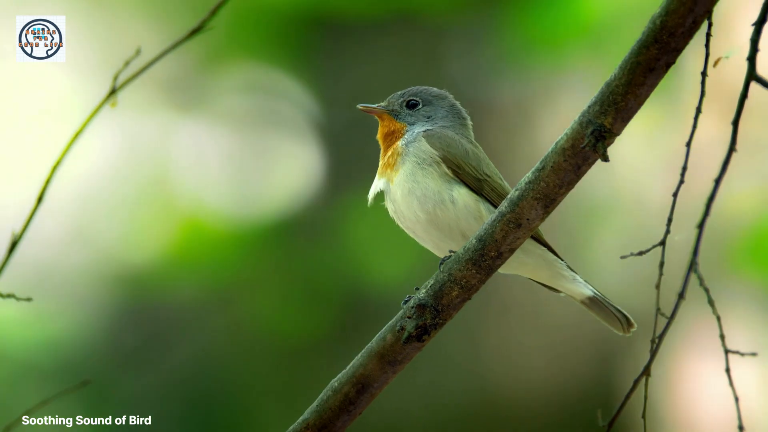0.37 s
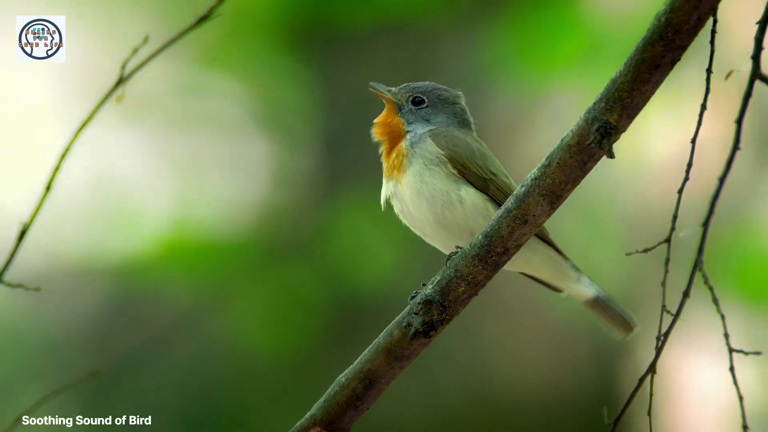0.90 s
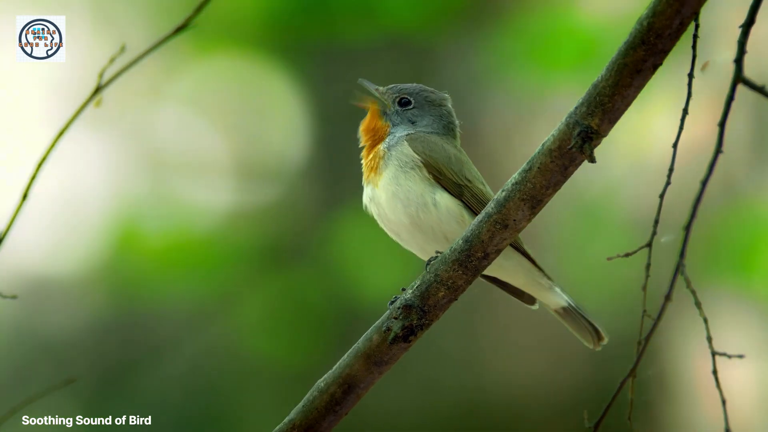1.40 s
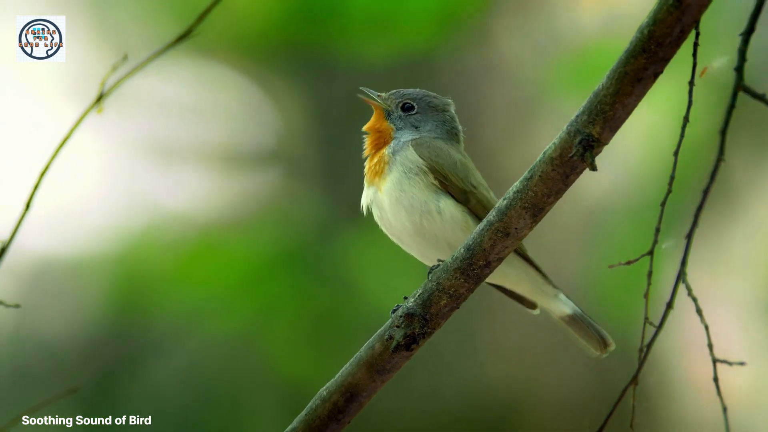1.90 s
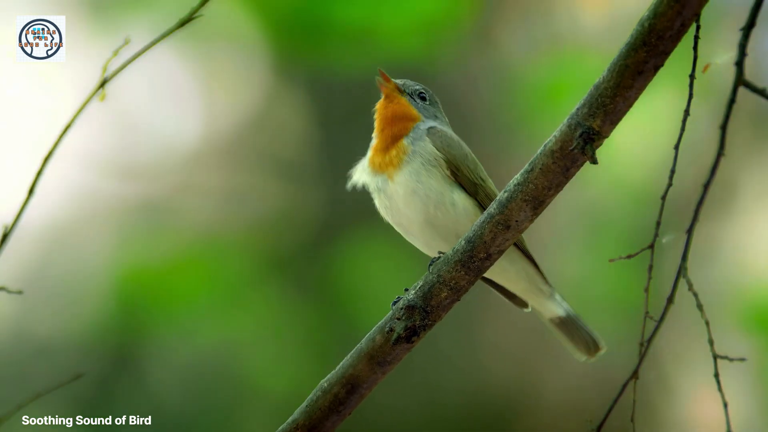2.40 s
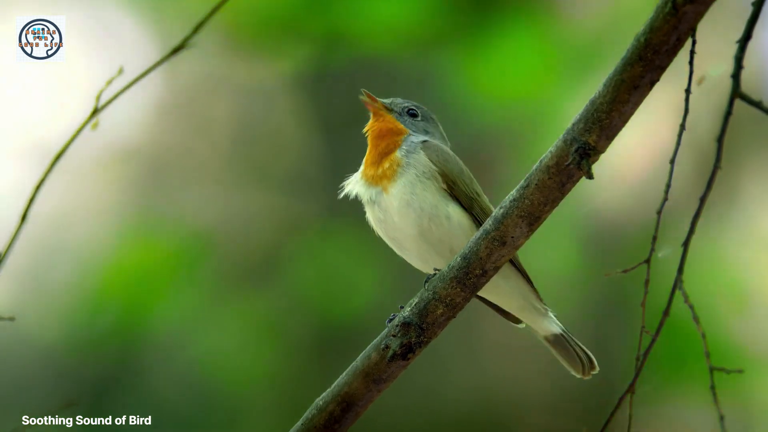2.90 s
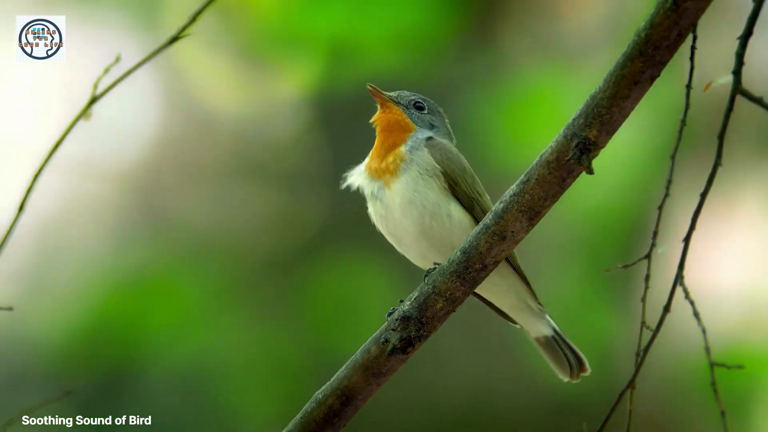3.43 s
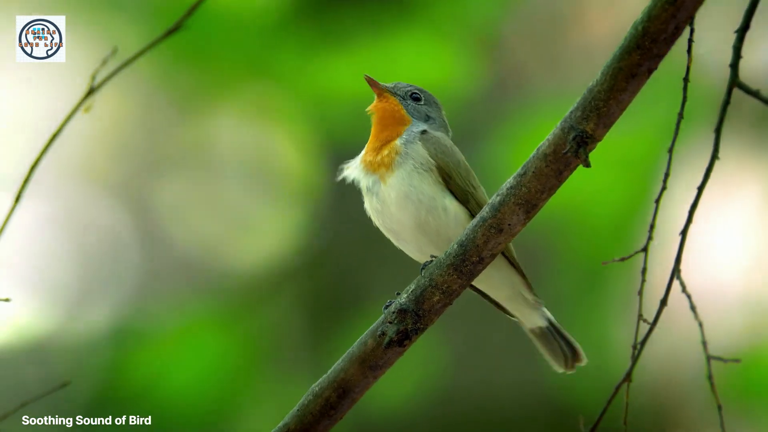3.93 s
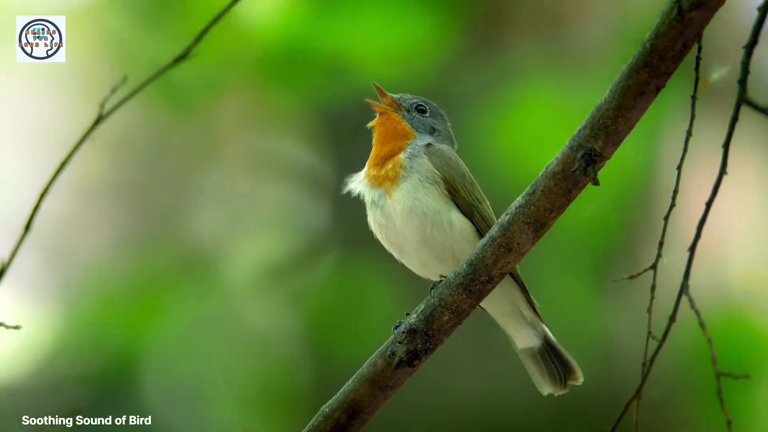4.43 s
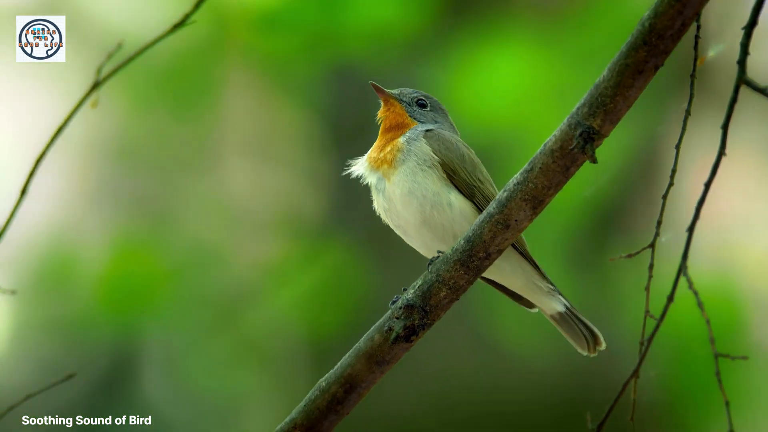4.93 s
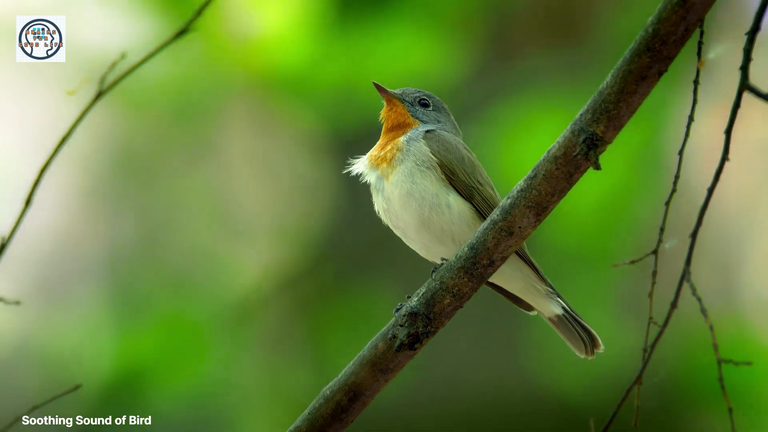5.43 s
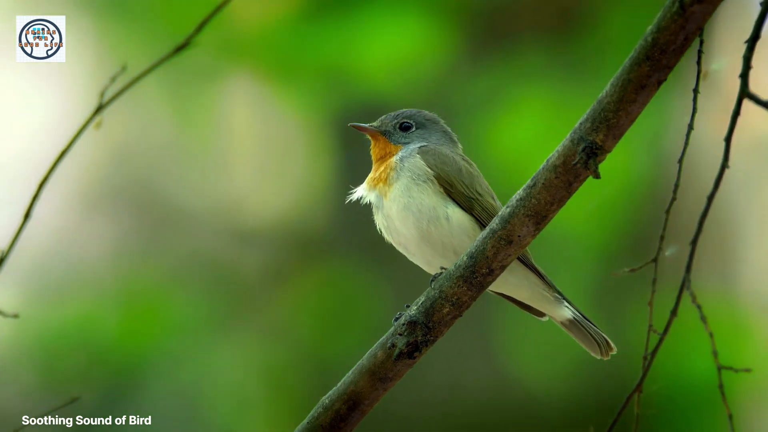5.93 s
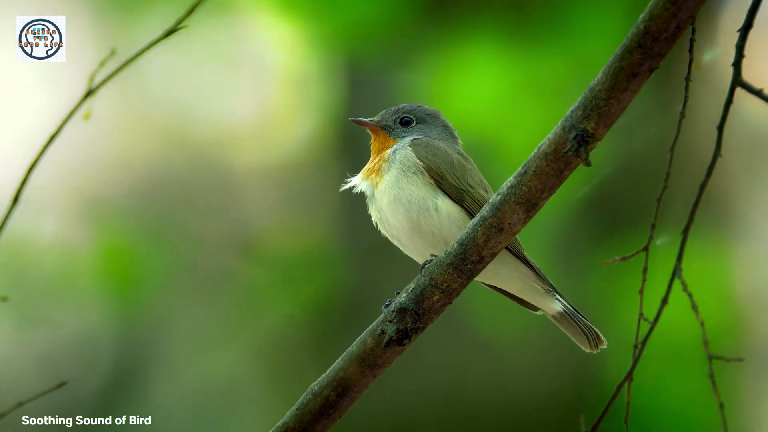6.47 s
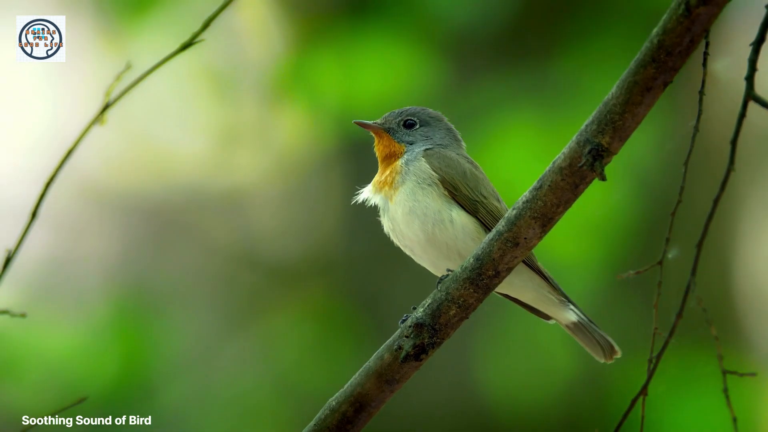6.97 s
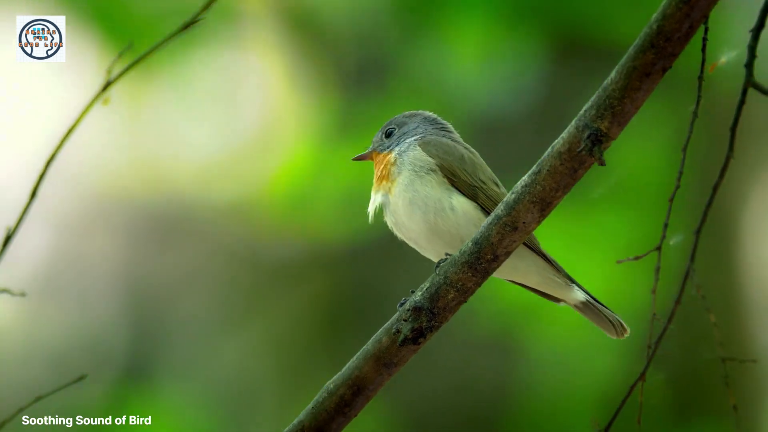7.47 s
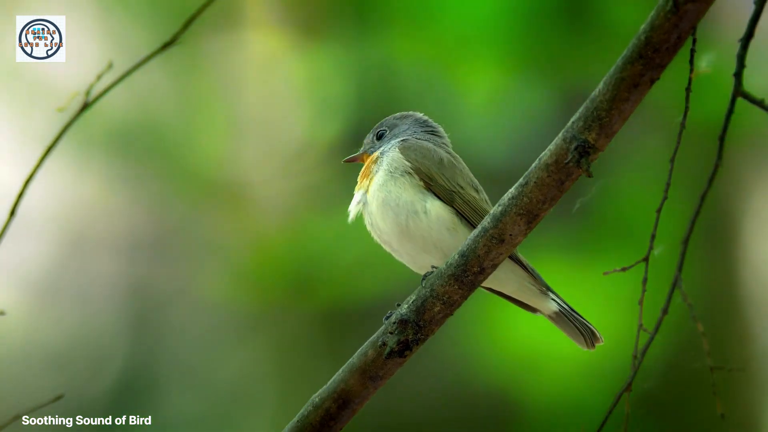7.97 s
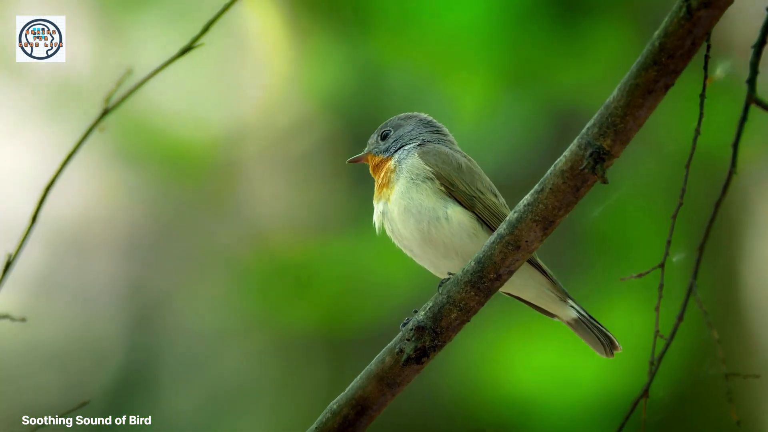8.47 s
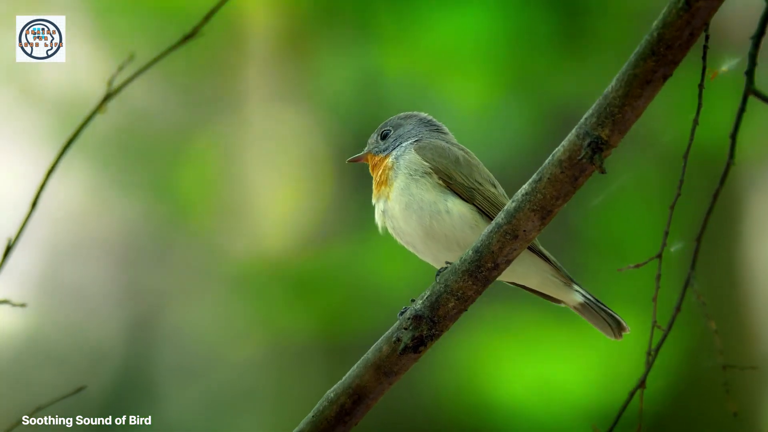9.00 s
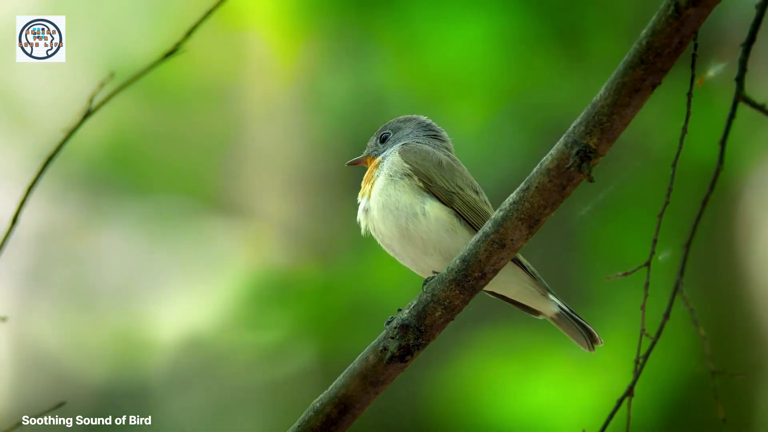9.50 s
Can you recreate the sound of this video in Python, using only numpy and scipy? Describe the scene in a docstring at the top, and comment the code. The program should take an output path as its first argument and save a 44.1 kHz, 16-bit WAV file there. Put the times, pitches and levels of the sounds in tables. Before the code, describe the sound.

A nearby songbird whistles a quickening, gradually lowering phrase, other birds calling around it, over a steady rushing stream with bubbles and droplet ticks.

```python
"""A songbird close by whistles a falling phrase; other birds call left, right and far off over a rushing stream.
Birds: gliding sine tones with level contours; a distant trill is a run of down-slurs.
Wood: discrete echoes of the near bird and decaying stereo noise tails on all birds.
Stream: banded noise rush, damped-sine bubbles and droplet ticks, and a hollow drone of resonant noise.
The middle of the rush's top treble drops out and returns."""
import sys
import numpy as np
from scipy import signal
from scipy.io import wavfile
from scipy.ndimage import uniform_filter1d

SR = 44100
rng = np.random.default_rng(int(sys.argv[2]) if len(sys.argv) > 2 else 0)


def master_out(mix):
    """Clip the mix to full scale and print it as 16-bit PCM to the path in sys.argv[1]."""
    frames = np.transpose(np.atleast_2d(mix))
    ceiling = np.clip(frames, -1, 1)
    pcm = np.round(ceiling * 32767).astype(np.int16)
    wavfile.write(sys.argv[1], SR, pcm)


def undo_db(level):
    """Turn decibels back into plain size, where 20 dB means ten times bigger."""
    steps = np.asarray(level, float) / 20
    return 10 ** steps


N = 424241

# Note shapes: (time [share of length], glide [share from first to last pitch], level offset [dB])
LEVELLING_RISE_SHAPE = [(0, 0, -13.5), (0.139, 0.412, -1.5), (.34, .78, 0.5), (.66, 1.1, 0), (1, 0.98, -16)]
DROP_SHAPE = [(0, 0, -6), (0.18, 0.7, 4), (.5, .83, 4), (1, 0.97, 0.1)]
HELD_SHAPE = [(0, 0.032, 0.5), (0.399, 0.33, 0.73), (1, 1, -1.1)]
SWEEP_SHAPE = [(0, 0.12, -2.5), (.3, 0.43, -0.5), (.7, .8, -2), (1, 0.94, -3.5)]
AHEAD = (0.7, 0.05)   # direction: (left over right [dB], phase lead of left [rad])


def unit_rms(x):
    """Scale to unit rms."""
    return x / np.sqrt(np.mean(x ** 2) + 1e-20)


def at_hz(points, hz):
    """Read a spectrum on a log-frequency axis."""
    table_hz, value = np.transpose(points)
    return np.interp(np.log(hz), np.log(table_hz), value)


def drift(corner_hz):
    """Slow random signal of about unit spread: noise through two one-pole lowpasses."""
    step = 40   # samples per control point
    warmup = 2000
    pole = np.exp(-2 * np.pi * corner_hz * step / SR)
    noise = rng.standard_normal(N // step + 2 + warmup)
    slow = signal.lfilter([1], [1, -2 * pole, pole ** 2], noise)[warmup:]
    return np.interp(np.arange(N) / step, np.arange(len(slow)), unit_rms(slow - slow.mean()))


def panned(x, pan_db):
    """Split into two channels, left pan_db above right."""
    return x * undo_db(np.array([[0.5], [-0.5]]) * pan_db)


def add(out, sound, start_s):
    """Mix a short sound in at start_s."""
    i = max(round(start_s * SR), 0)
    out[..., i:i + sound.shape[-1]] += sound[..., :N - i]


def notes(events, shape):
    """Lay one shape over each event: rows of (time [s], pitch [Hz], level [dB])."""
    at, share, offset_db = np.transpose(shape)
    out = []
    for start_s, length_s, first_hz, last_hz, db, *change_db in events:
        hz = first_hz + share * (last_hz - first_hz)
        level_db = db + offset_db + sum(change_db) * (at - 0.5)
        out.append(np.transpose([start_s + at * length_s, hz, level_db]))
    return out


def whistle(rows, edge_s, flutter_db, wobble, flutter_per_s):
    """One note: a rotating complex tone on a rounded glide, soft edges, unsteady pitch and level."""
    s, hz, db = np.transpose(rows)
    t = np.arange(s[0] - edge_s, s[-1] + edge_s, 1 / SR)
    since_start = t - t[0]
    rounding = max(int(np.diff(s).min() * SR * 0.44), 1)   # samples
    glide_hz = uniform_filter1d(np.interp(t, s, hz), size=rounding, mode="nearest")
    edges = np.clip(np.minimum(since_start, t[-1] - t) / edge_s, 0, 1) ** 2
    knots, bends = rng.standard_normal((2, 64))
    glide_hz = glide_hz * (1 + wobble * np.interp(since_start * 120, np.arange(64), bends))
    flutter = flutter_db * np.interp(since_start * flutter_per_s, np.arange(64), knots)
    level = undo_db(np.interp(t, s, db) + flutter) * edges
    return level * np.exp(2j * np.pi * np.cumsum(glide_hz) / SR), t[0]


def woods(x, t60_s, alike, onset_s):
    """Scattering off many trunks: convolution with a noise tail that swells, then dies away."""
    t = np.arange(SR) / SR
    mid, side = rng.standard_normal((2, SR))
    alike = np.clip(alike, 0, 1)
    tail = np.sqrt(alike) * mid + np.sqrt(1 - alike) * side * [[1], [-1]]
    tail = tail * undo_db(-60 * t / t60_s) * (1 - np.exp(-t / onset_s))
    tail = tail / np.sqrt(np.sum(tail ** 2) / 2)
    return signal.fftconvolve(np.broadcast_to(x, (2, N)), tail, axes=1)[:, :N]


def slurs():
    """The singer's hooked drops, loudest as they cross the throat's resonance."""
    throat_hz, throat_db_per_octave = 3700, 10.5
    # Slur shape: (time [s], last row ignored: end of note; glide [share from top to last pitch], offset [dB])
    slur_shape = [(0, 0.2746, -20), (0.012, 0.025, 8.5), (.021, 0.129, 8.5), (0.032, 0.425, 10),
                  (.045, .68, 9.5), (.058, .85, 7.5), (1, 0.98, -5)]
    # (time [s], length [s], top [Hz], last [Hz], level [dB], extra time leaving the top [s])
    slur_events = [(0.988, 0.056, 4890, 3340, -31.5, 0.011), (2.036, 0.076, 4925, 3270, -28, 0.0089),
                   (2.53, 0.087, 4960, 3250, -24.5, .003), (3.034, 0.09, 4845, 3244, -25, 0.0021),
                   (3.296, 0.091, 4795, 3237, -25, .003), (3.555, 0.12, 4547, 3137, -26.5, 0.0046),
                   (3.825, 0.099, 4406, 3132, -27.5, 0.0024), (4.109, 0.11, 4580, 2990, -27, 0.0023),
                   (4.418, 0.11, 4220, 2910, -27, 0.00091)]
    at_s, share, offset_db = np.transpose(slur_shape)
    late = np.arange(len(at_s) - 1) >= 2   # points after the top
    out = []
    for start_s, length_s, top_hz, last_hz, db, linger_s in slur_events:
        t = np.append(at_s[:-1] + linger_s * late, length_s)
        hz = top_hz + share * (last_hz - top_hz)
        off_resonance_db = throat_db_per_octave * np.abs(np.log2(hz / throat_hz))
        level_db = db + offset_db - off_resonance_db
        out.append(np.transpose([start_s + np.maximum.accumulate(t), hz, level_db]))
    return out


def singer():
    """The near bird's gliding tones, dulled echoes off ground and trunks, and a diffuse tail."""
    # Note shapes: (time [share of length], glide [share from first to last pitch], level offset [dB])
    thin_fall_shape = [(0, 0.044, -24), (0.278, 0.58, -8.5), (.55, .9, -9.5), (1, 0.99, -11)]
    mid_rise_shape = [(0, 0.031, -15.5), (.4, 0.4, -4.5), (0.749, .88, -6), (1, 0.91, -11.5)]
    chip_shape = [(0, 0.034, -1.5), (1, 1, 9)]
    # Notes: (time [s], length [s], first [Hz], last [Hz], level [dB])
    thin_falls = [(.015, 0.042, 7550, 6400, -33), (.255, 0.054, 8000, 6340, -30.5),
                  (.49, 0.05, 8100, 6320, -28), (.705, 0.065, 8540, 6300, -26),
                  (1.275, 0.061, 8440, 6300, -26.5), (1.54, 0.045, 7500, 6380, -22),
                  (1.77, 0.062, 8300, 6350, -21.5), (2.252, 0.058, 8390, 6380, -18),
                  (2.745, 0.062, 8280, 6230, -18)]
    chips = [(1.25, 0.013, 5870, 5940, -47.5), (2.228, 0.015, 5670, 6100, -42),
             (2.722, 0.011, 5600, 5970, -36.5)]
    # Notes: (time [s], length [s], first [Hz], last [Hz], level [dB],
    #         level change from start to end of the note, partly from overlapping echoes [dB])
    mid_rises = [(.062, 0.044, 5370, 5900, -31, -12), (.315, 0.043, 5430, 5880, -29, -18),
                 (.53, 0.069, 5000, 5460, -27.5, -10), (.76, 0.064, 5290, 5590, -25.5, 3),
                 (1.33, 0.054, 5210, 5660, -23.5, 13), (1.57, 0.073, 4970, 5870, -19.5, -3),
                 (1.812, 0.068, 4990, 5650, -20, -1), (2.297, 0.064, 5100, 5770, -17, 7),
                 (3.272, 0.032, 5370, 5435, -25, -2)]
    levelling_rises = [(.908, 0.059, 3920, 4220, -23, 11), (1.957, 0.066, 3870, 4230, -21, 4),
                       (2.447, 0.088, 3970, 4253, -18, 2), (2.8, 0.075, 4740, 5600, -21, 1),
                       (2.946, 0.097, 3827, 4210, -16.5, 4), (3.21, 0.079, 3615, 4090, -14, 6),
                       (3.475, 0.085, 3620, 4000, -15.5, -1), (3.75, 0.086, 3600, 3930, -16, -6),
                       (4.027, 0.082, 3520, 3892, -15.5, -0.5), (4.337, 0.087, 3490, 3850, -17.5, -2)]
    # Echoes: (delay [s], level [dB])
    echoes = [(.0073, -9), (.017, -6), (.03, -27)]
    song = notes(thin_falls, thin_fall_shape) + notes(mid_rises, mid_rise_shape)
    song += notes(chips, chip_shape) + notes(levelling_rises, LEVELLING_RISE_SHAPE) + slurs()
    voice = np.zeros(N)
    for note in song:
        tone, start_s = whistle(note, edge_s=0.0066, flutter_db=1.0, wobble=0.003, flutter_per_s=110.0)
        add(voice, tone.imag, start_s)
    heard = voice.copy()
    echo_cut_hz = 7500   # leaves soak up the highs
    dulled = signal.sosfilt(signal.butter(2, echo_cut_hz, fs=SR, output="sos"), voice)
    for delay_s, db in echoes:
        add(heard, undo_db(db) * dulled, delay_s)
    return heard + undo_db(-6.5) * woods(voice, t60_s=0.94, alike=1.0, onset_s=0.0036)


def others(calls, wet_db, flutter_db, wobble, t60_s, flutter_per_s):
    """Whistled calls, each direction with its own level and phase between channels, plus a tail."""
    voices = np.zeros((2, N))
    for (pan_db, lead_rad), events, shape in calls:
        for note in notes(events, shape):
            tone, start_s = whistle(note, edge_s=0.0066, flutter_db=flutter_db, wobble=wobble,
                                    flutter_per_s=flutter_per_s)
            stereo = tone * np.exp([[0], [-1j * lead_rad]])
            add(voices, panned(stereo, pan_db).imag, start_s)
    return voices + undo_db(wet_db) * woods(voices, t60_s=t60_s, alike=0.67, onset_s=0.004)


def neighbours():
    """Lower-voiced birds nearby: whistled notes from the right, left and ahead."""
    # Directions: (left over right [dB], phase lead of left [rad])
    left, right = (2.6, -2.24), (-4.5, 0.34)
    # Note shapes: (time [share of length], glide [share from first to last pitch], level offset [dB])
    arch_shape = [(0, 0.41, -5.5), (.55, 0.86, -2), (1, 0.066, -1)]
    peak_shape = [(0, 0.039, -8), (.3, 0.6, -1.5), (.6, 1, -3), (1, 0.05, 1.5)]
    # Calls by direction and shape: (time [s], length [s], first [Hz], last [Hz], level [dB])
    right_drops = [(.376, 0.0392, 3250, 2340, -29), (.487, 0.045, 3690, 2094, -31),
                   (.613, 0.044, 3105, 2217, -30.5), (.955, 0.035, 2850, 2000, -32),
                   (1.083, 0.0263, 3096, 2040, -31.5), (1.203, 0.032, 2810, 2036, -34.5)]
    right_sweeps = [(1.685, 0.021, 2570, 2270, -34), (1.706, 0.013, 2205, 2020, -36),
                    (1.808, 0.039, 3050, 2177, -30.5), (1.933, 0.041, 2900, 2075, -32.5)]
    right_peaks = [(3.107, 0.056, 2493, 3580, -33)]
    right_arches = [(2.851, 0.024, 2560, 2870, -35)]
    left_arches = [(.492, 0.0544, 3790, 3954, -24), (.758, 0.0514, 4208, 4440, -27.5),
                   (2.2, 0.015, 2965, 3000, -27), (2.36, 0.031, 2700, 2870, -32),
                   (2.39, 0.02, 3540, 3750, -37.5), (2.475, 0.022, 2970, 3070, -39.5)]
    left_held = [(.54, 0.079, 3783, 3630, -30), (2.135, 0.045, 3700, 3700, -44),
                 (2.296, 0.028, 3030, 3100, -39), (2.566, 0.034, 2630, 2410, -39),
                 (2.8, 0.027, 2638, 2533, -42)]
    ahead_held = [(.001, 0.044, 2496, 2146, -37.5), (.001, 0.17, 3734, 3800, -45),
                  (.001, 0.12, 4330, 4280, -50), (.265, 0.0715, 3740, 3660, -35),
                  (.41, 0.056, 3626, 3615, -34), (1.74, 0.029, 2770, 3403, -38),
                  (2.7, 0.02, 3500, 3510, -38)]
    right_calls = [(right, right_drops, DROP_SHAPE), (right, right_sweeps, SWEEP_SHAPE),
                   (right, right_peaks, peak_shape), (right, right_arches, arch_shape)]
    other_calls = [(left, left_arches, arch_shape), (left, left_held, HELD_SHAPE),
                   (AHEAD, ahead_held, HELD_SHAPE)]
    return (others(right_calls, wet_db=-1.8, flutter_db=1.8, wobble=0.005, t60_s=0.9, flutter_per_s=140.0)
            + others(other_calls, wet_db=-0.5, flutter_db=3.0, wobble=0.006, t60_s=1.0, flutter_per_s=140.0))


def far_birds():
    """Thin whistled calls from deeper in the wood, to the sides and ahead."""
    # Directions: (left over right [dB], phase lead of left [rad])
    far_left, far_right = (2.5, -2.13), (-4.5, 1.2)
    # Note shapes: (time [share of length], glide [share from first to last pitch], level offset [dB])
    droop_shape = [(0, 0.14, -4), (.4, 0.16, -2), (.78, .5, 7), (1, 0.89, 3)]
    hook_shape = [(0, -0.039, -1), (.25, 0.917, -2.5), (.82, 1, 0.5), (1, -1.2, -1)]
    churr_shape = [(0, .55, -6), (.21, 0, -6), (.35, .3, -2), (.48, 0, -5.5), (.63, .33, -4),
                   (.78, .05, -1), (1, 0.96, -6)]
    short_churr_shape = [(0, .4, -5), (.45, 0.044, -2), (.72, .06, 0), (1, 1, -2)]
    fading_shape = [(0, 0.14, 3.5), (1, 1, -9.5)]
    # Calls: (time [s], length [s], first [Hz], last [Hz], level [dB]);
    # some left_held add (level change from start to end of the note [dB])
    left_droops = [(1.56, 0.062, 8150, 6900, -48), (1.69, 0.067, 8200, 6900, -48),
                   (1.83, .08, 8250, 6900, -47), (1.99, 0.086, 8100, 7500, -49)]
    left_held = [(0.039, 0.083, 7570, 7170, -40), (.07, 0.079, 7950, 8000, -51),
                 (.22, 0.18, 7580, 7410, -49.5), (.26, 0.1, 3780, 3350, -40), (0.319, .06, 3950, 4050, -43),
                 (6.505, 0.057, 7570, 8020, -48.5), (6.575, 0.058, 6960, 5140, -48),
                 (6.695, .072, 3870, 2900, -35.5, 2.5), (6.79, .05, 3800, 3880, -46),
                 (1.41, .075, 8020, 7500, -41, 4), (6.775, 0.055, 3150, 3450, -43),
                 (7.02, 0.047, 4380, 4330, -41), (7.148, 0.021, 4300, 4320, -33.5)]
    left_drops = [(6.669, 0.023, 5100, 3950, -46)]
    left_hooks = [(6.918, 0.072, 4210, 4390, -35), (7.08, 0.043, 4200, 4350, -28)]
    left_sweeps = [(7.122, 0.03, 4300, 3800, -44), (7.318, 0.0205, 4550, 4040, -30)]
    left_rises = [(7.25, .095, 4240, 4590, -32.5), (7.4, 0.072, 4470, 4600, -45)]
    right_churrs = [(3.39, 0.066, 6930, 5250, -36.5), (3.5, 0.062, 6740, 5290, -34)]
    right_short_churrs = [(3.615, 0.049, 6720, 5380, -38), (3.725, 0.044, 6370, 5060, -40.5)]
    ahead_fading = [(3.77, 0.036, 6200, 6000, -48), (4.862, 0.074, 4820, 4480, -43),
                    (5.931, 0.11, 4090, 4180, -48)]
    ahead_held = [(4.655, 0.16, 5040, 4800, -54), (4.895, 0.027, 5700, 6530, -50),
                  (5.51, 0.16, 4900, 4960, -54), (5.22, 0.13, 5850, 5870, -59),
                  (5.43, 0.17, 5950, 5800, -60), (7.59, 0.038, 3650, 3680, -52),
                  (7.735, 0.035, 3520, 3600, -55), (7.885, .05, 3350, 3530, -61),
                  (8.17, .04, 3360, 3400, -51), (8.28, .05, 3880, 3730, -49), (7.63, .04, 3610, 4070, -53),
                  (7.795, .018, 3500, 4200, -49), (7.94, 0.022, 3540, 4100, -47),
                  (8.035, 0.057, 3700, 3830, -48), (8.22, 0.056, 3600, 3950, -51),
                  (8.59, 0.14, 3700, 3640, -51), (9.387, 0.025, 3060, 3520, -38),
                  (9.432, 0.02, 3700, 3760, -39)]
    # Same columns: falling notes of a far warble; accented strokes of the distant trill
    warble_drops = [(7.69, 0.025, 3950, 3450, -50), (7.838, 0.026, 3950, 3400, -47),
                    (7.978, 0.032, 3950, 3460, -46), (8.128, 0.032, 4080, 3300, -47),
                    (7.78, .02, 3740, 3400, -49), (8.098, 0.013, 4020, 3440, -49),
                    (8.21, .02, 3350, 3070, -50)]
    trill_strokes = [(8.601, .014, 3370, 3100, -40), (8.672, 0.019, 3350, 3080, -41),
                     (8.742, 0.0174, 3500, 3020, -35.5), (8.815, 0.0176, 3600, 3100, -38),
                     (8.89, 0.0205, 3550, 3030, -41), (8.961, 0.0175, 3560, 3000, -38),
                     (9.038, 0.0202, 3600, 2950, -36), (9.177, 0.0184, 3600, 3100, -37)]
    left_calls = [(far_left, left_droops, droop_shape), (far_left, left_held, HELD_SHAPE),
                  (far_left, left_drops, DROP_SHAPE), (far_left, left_hooks, hook_shape),
                  (far_left, left_sweeps, SWEEP_SHAPE), (far_left, left_rises, LEVELLING_RISE_SHAPE)]
    right_calls = [(far_right, right_churrs, churr_shape),
                   (far_right, right_short_churrs, short_churr_shape)]
    ahead_calls = [(AHEAD, ahead_fading, fading_shape), (AHEAD, warble_drops, DROP_SHAPE),
                   (AHEAD, ahead_held, HELD_SHAPE), (AHEAD, trill_strokes, HELD_SHAPE)]
    return (others(left_calls, wet_db=-0.5, flutter_db=4.0, wobble=0.012, t60_s=0.65, flutter_per_s=180.0)
            + others(right_calls, wet_db=-1.5, flutter_db=1.5, wobble=0.004, t60_s=0.8, flutter_per_s=180.0)
            + others(ahead_calls, wet_db=-3.0, flutter_db=2.5, wobble=0.006, t60_s=0.6, flutter_per_s=150.0))


def trill():
    """Bursts of quick uneven down-slurs, blurred by the trees: the tail outweighs the direct sound."""
    # Bursts: (time [s], length [s], centre [Hz], slur depth [share of centre],
    #          level at start [dB], level change over the burst [dB])
    bursts = [(1.1, 0.68, 3337, 0.189, -35, -6), (1.758, 0.18, 3308, 0.211, -36, 0),
              (2.2, 0.4, 3095, 0.28, -42.5, -1), (8.593, 0.14, 3240, 0.035, -43, 1),
              (8.743, 0.4, 3333, 0.175, -37.5, 0.5), (9.165, 0.13, 3350, 0.22, -35, -9),
              (9.41, 0.2, 3330, 0.14, -33.5, -3)]
    t = np.arange(N) / SR
    level, centre_hz, depth = np.zeros((3, N))
    for start_s, length_s, hz, share, db, change_db in bursts:
        inside = (t >= start_s) & (t <= start_s + length_s)
        level[inside] = undo_db(db + change_db * (t[inside] - start_s) / length_s)
        centre_hz[inside], depth[inside] = hz, share
    slurs_per_s = 46.0 * (1 + 0.25 * drift(8.3))
    progress = np.cumsum(slurs_per_s) / SR % 1   # through each slur
    pitch_hz = centre_hz * (1 + depth * (1 - 2 * progress) + 0.018 * drift(31.1))
    envelope = level * undo_db(2.8 * drift(17.0)) * np.sin(np.pi * progress)
    voice = envelope * np.sin(2 * np.pi * np.cumsum(pitch_hz) / SR)
    tail = woods(voice, t60_s=0.4, alike=0.9, onset_s=0.005)
    return undo_db(-3) * voice + undo_db(3.0) * tail


def bubble(hz, cycles, rise):
    """A damped sine whose pitch climbs as the bubble nears the surface."""
    turns = np.arange(int(cycles * SR / hz)) * hz / SR
    envelope = np.minimum(turns / 1.73, 1) * undo_db(-40 * turns / cycles)
    return envelope * np.sin(2 * np.pi * turns * (1 + rise * turns / cycles))


def water_drops():
    """Damped rising sines: placed large bubbles and ticks, and a random swarm of both."""
    # Large bubbles: (time [s], level [dB], start pitch [Hz], left over right [dB])
    plops = [(0.065, -35, 866, 5), (0.149, -37.5, 840, -1.0), (0.2, -35, 750, 0.5), (0.356, -36, 1120, 2.0),
             (0.8, -28, 645, 3), (1.368, -36, 650, 4), (2.08, -33.5, 775, 2), (2.524, -40, 856, -1),
             (2.842, -38, 1240, -0.5), (3.11, -29.5, 707, 1), (3.812, -34, 844, 4),
             (3.969, -34.5, 1250, -5), (4.601, -29, 778, 1.0), (4.995, -39, 814, 1), (5.287, -35, 830, 0.5),
             (5.629, -39, 880, 4), (5.884, -30.5, 910, 1), (6.142, -31.5, 875, 2), (6.264, -28, 760, 2),
             (6.737, -31.5, 1270, 4), (6.933, -40, 550, 3), (7.007, -30, 677, 1.5), (7.519, -36, 804, 0.5),
             (7.772, -39, 700, 4), (8.127, -39, 807, 1.0), (8.268, -37, 814, 1.0), (8.374, -35, 815, 1.5),
             (8.548, -26, 870, 3), (0.656, -38, 1100, 0.0), (1.404, -31.5, 1770, 1.0),
             (2.418, -37, 1330, -1), (4.601, -29, 1270, 3), (5.165, -39, 770, 2), (5.29, -36, 1460, 0.0),
             (5.34, -39, 770, 2), (5.765, -33.5, 810, 2), (6.047, -37, 1230, 5), (6.225, -38, 1360, 0.0),
             (7.575, -36, 774, 0.0), (7.787, -36.5, 1270, 1.5), (7.965, -36, 1620, 0.0),
             (7.99, -38, 1140, 0.0), (8.03, -45, 796, 0.0), (8.076, -34, 1420, 1.0), (8.1, -37, 754, 2),
             (8.44, -39, 800, 0.0), (8.803, -36, 1570, 2.5), (8.835, -41, 905, 0.0), (8.96, -37, 880, 2),
             (9.241, -29.5, 740, 1.5), (9.445, -42, 805, 3.0)]
    # Droplet ticks: (time [s], level [dB], start pitch [Hz], left over right [dB])
    ticks = [(1.4531, -40, 7800, 3.0), (4.738, -31, 6700, 0), (5.029, -26.5, 2970, 0.5),
             (5.238, -29, 5600, -9), (5.7803, -29, 6000, -0.5), (5.8825, -27, 4800, 0.5),
             (5.79, -33, 5100, 0.0), (5.892, -27, 5230, 0.0), (5.9221, -29, 5800, 0.5),
             (6.265, -31, 5700, 0.0), (6.29, -34, 4900, 0.0), (6.2, -44, 4900, 0.0), (6.24, -25, 2800, 0.5),
             (6.2503, -34, 5100, 0.0), (6.8142, -30, 6200, -0.5), (6.8547, -33, 6700, 2),
             (6.8771, -19, 3700, -0.5), (6.962, -29, 5160, 6.0), (7.3745, -26, 6170, 0),
             (7.458, -30, 5400, 0.0), (7.573, -36.5, 5360, -14), (7.6513, -32, 5056, -0.5),
             (8.037, -28, 2630, 0.5), (8.3708, -19, 4650, 2), (8.821, -24, 4570, 1), (9.261, -27, 4890, 2),
             (9.365, -23.5, 4970, 0.0)]
    out = np.zeros((2, N))
    for start_s, db, hz, pan_db in plops:
        add(out, panned(undo_db(db) * bubble(hz, cycles=37.3, rise=0.074), pan_db), start_s)
    for start_s, db, hz, pan_db in ticks:
        add(out, panned(undo_db(db) * bubble(hz, cycles=15.8, rise=0.027), pan_db), start_s)
    for when, pitch, size, side in rng.random((500, 4)):
        db = -50.0 + 6.04 * min(-np.log(size), 2.5)
        gurgle = undo_db(db) * bubble(640 * 3.5 ** pitch ** 2.0, cycles=14.6, rise=0.094)
        add(out, panned(gurgle, 1.2 + 4.0 * (side - 0.5)), when * N / SR)
    for when, pitch, size, side in rng.random((400, 4)):
        db = -40.5 + 3.2 * min(-np.log(size), 2.5)
        tick = undo_db(db) * bubble(2500 * 2.9 ** pitch, cycles=19.0, rise=0.058)
        add(out, panned(tick, 6.0 * (side - 0.5)), when * N / SR)
    return out


def rush():
    """The stream: bands of stereo noise with uneven level; the top bands are gated, not by the water."""
    level_db, patchy_db = -42, 2.5
    # Stream spectrum: (frequency [Hz], relative density [dB per Hz])
    spectrum = [(18, -65.5), (30, -26), (59, -7), (127, -6.5), (203, -5), (243, -17), (316, -10),
                (577, -14), (624, -15.5), (770, -10), (1110, -13), (4000, -15.5), (4330, -17), (5920, -25),
                (15600, -34)]
    # Stereo likeness: (frequency [Hz], left-right correlation [-1 to 1])
    likeness = [(40, 0.93), (100, -0.039), (200, 0.99), (350, -0.28), (800, 0.38), (2000, 0.33),
                (4500, 0.78), (8000, 0.42), (11000, 0.46), (15000, -0.28)]
    out = 0
    together = drift(3)
    edges_hz = np.geomspace(25, 16000, 25)
    gate = drift(13.6)   # drops out the top treble of the mid channel
    gate = unit_rms(gate - uniform_filter1d(gate, size=SR // 2))
    white = rng.standard_normal((2, 2, N))
    for k, (low, high) in enumerate(zip(edges_hz, edges_hz[1:])):
        band = signal.butter(2, [low, high], "band", fs=SR, output="sos")
        mid, side = signal.sosfilt(band, white[k % 2])   # neighbouring bands use separate noise
        hz = np.sqrt(low * high)
        alike = np.clip(at_hz(likeness, hz), -1, 1)
        gain = undo_db(at_hz(spectrum, hz) + patchy_db * (0.39 * together + drift(16.4)))
        if hz > 9500:   # gating laid over the stream's own sound
            mid = mid * undo_db(12.4 * np.minimum(gate, 1.3) - 14.0)
            side = side * undo_db(3.3 * drift(6.4))
        out = out + gain * (np.sqrt(1 + alike) * mid + np.sqrt(1 - alike) * side * [[1], [-1]])
    return undo_db(level_db) * unit_rms(out)


def drone():
    """Falling water drives a hollow among the stones: noise in one low resonance."""
    centre_hz, width_hz, level_db, pan_db = 197.7, 15.5, -49, 8
    pole = np.exp(-np.pi * width_hz / SR)
    resonator = [1, -2 * pole * np.cos(2 * np.pi * centre_hz / SR), pole ** 2]
    ring = signal.lfilter([1, 0, -1], resonator, rng.standard_normal(N))
    return panned(undo_db(level_db + 1.2 * drift(3.1)) * unit_rms(ring), pan_db)


def scene():
    """Birds over the stream."""
    birds = singer() + neighbours() + far_birds() + trill()
    stream = water_drops() + rush() + drone()
    return birds + stream


def low_pass(x):
    """Removes everything above the highest recorded frequency."""
    return signal.sosfilt(signal.butter(12, 15750, fs=SR, output="sos"), x)


def record(dry):
    """Deliver the finished mix."""
    return low_pass(dry)


dry = scene()
out = record(dry)
master_out(out)
```